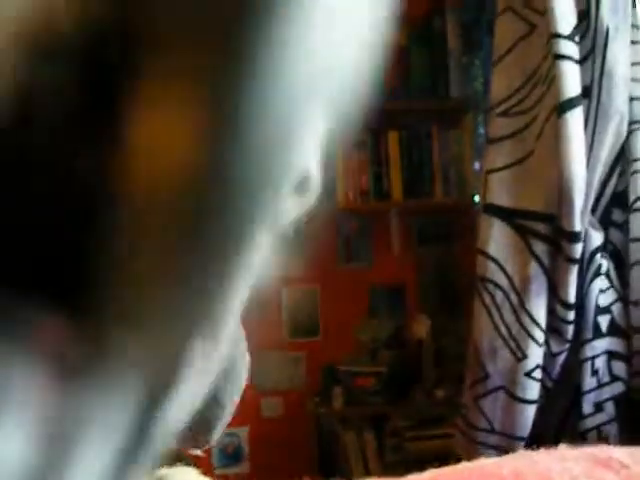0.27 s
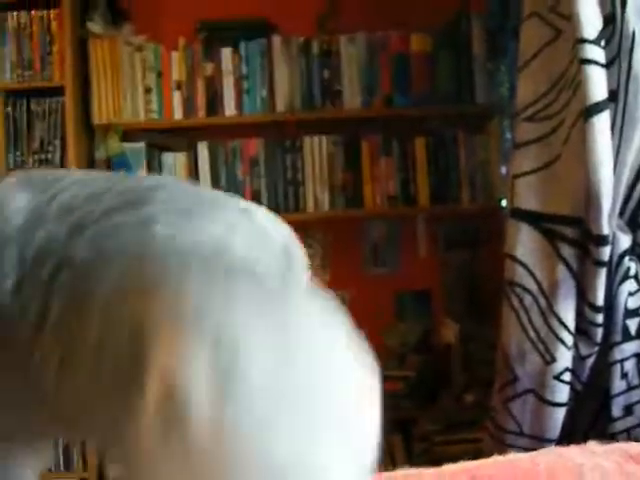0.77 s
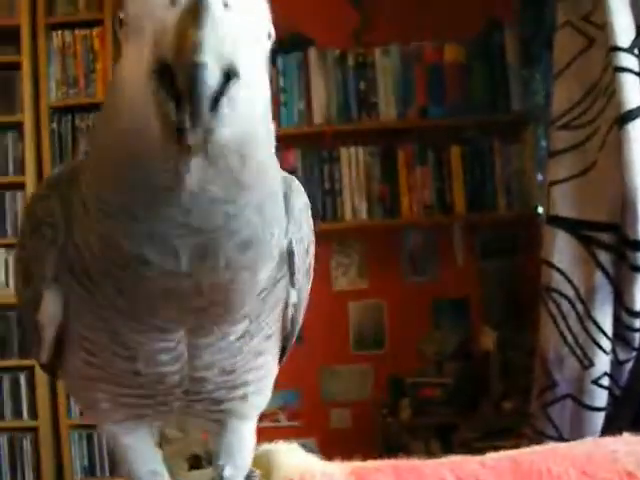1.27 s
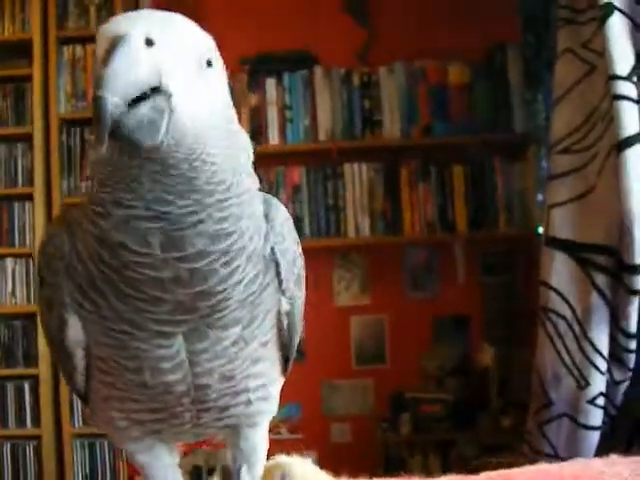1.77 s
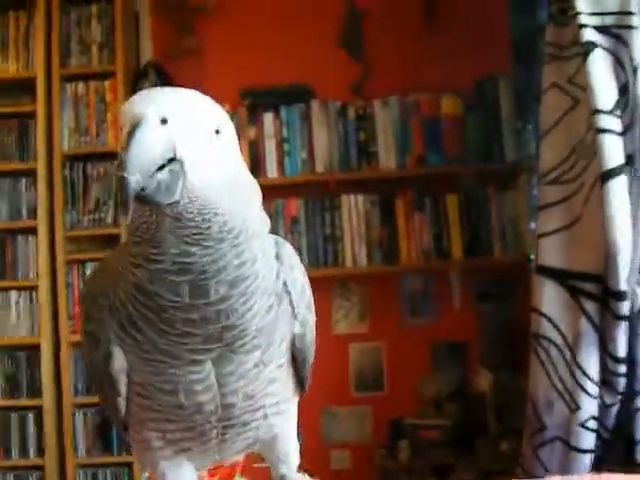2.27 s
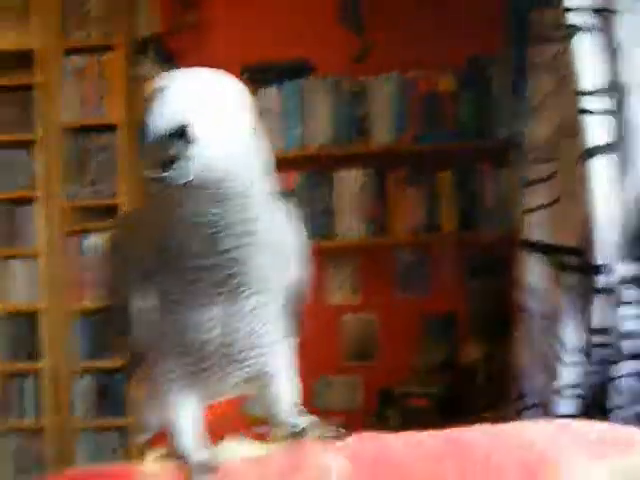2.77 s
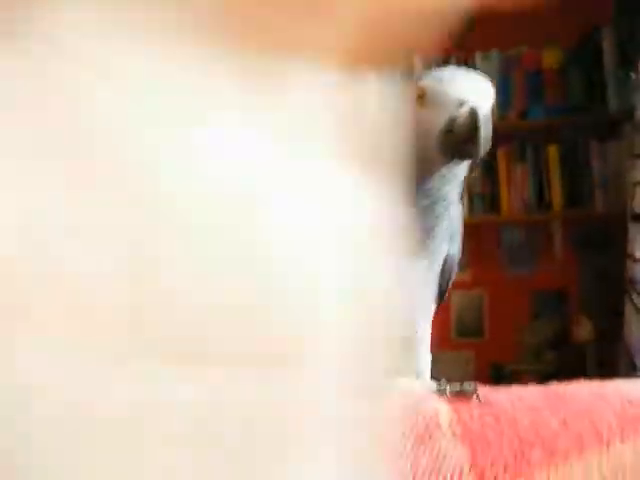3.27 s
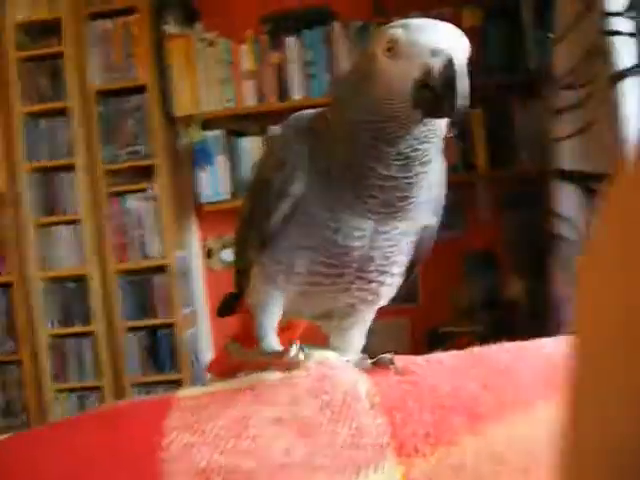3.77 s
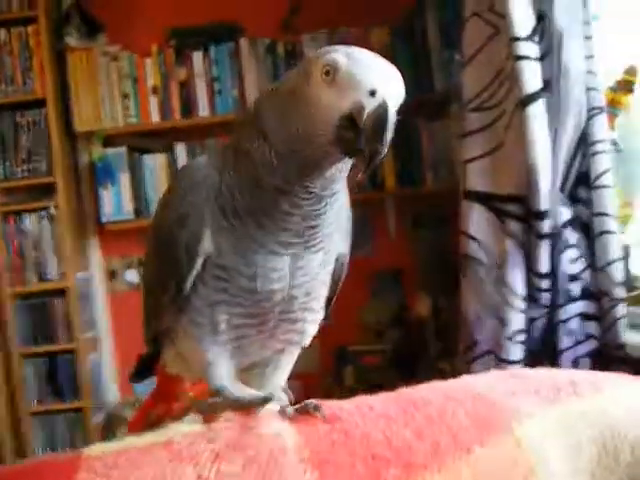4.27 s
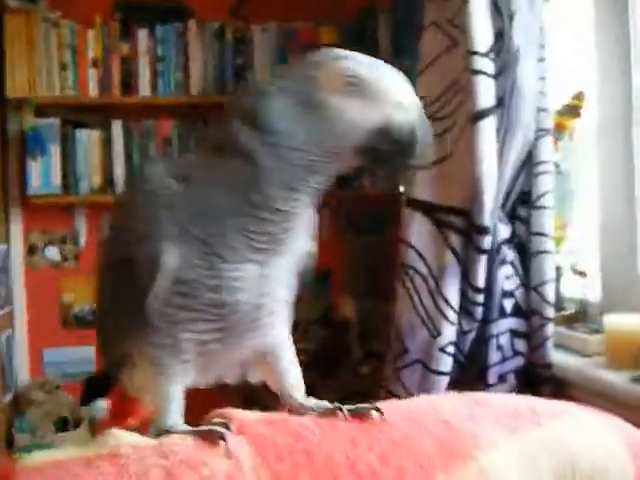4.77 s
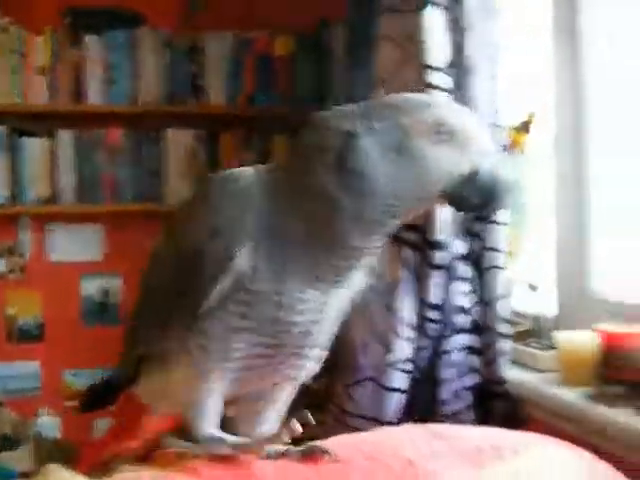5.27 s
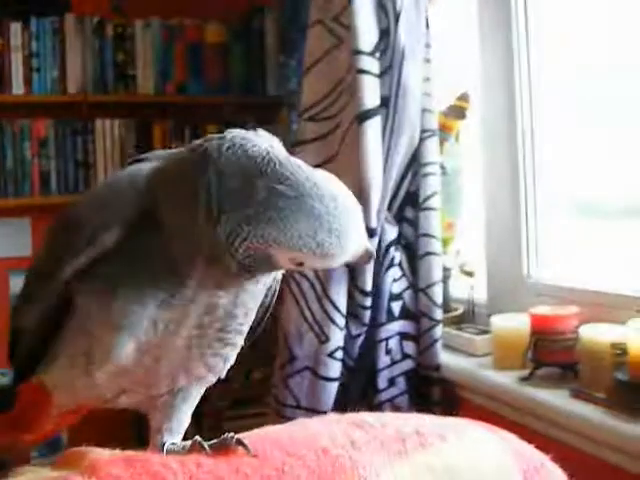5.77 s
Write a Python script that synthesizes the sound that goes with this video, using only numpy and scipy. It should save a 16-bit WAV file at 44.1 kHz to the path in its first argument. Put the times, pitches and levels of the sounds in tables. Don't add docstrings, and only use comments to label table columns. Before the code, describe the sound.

A parrot's beak ticks and clacks sharply twice amid dull perch knocks and soft cloth rustle, over a steady fan whine, hiss and growing hum.

```python
import sys
import numpy as np
from scipy import signal
from scipy.io import wavfile

SR = 44100
rng = np.random.default_rng(int(sys.argv[2]) if len(sys.argv) > 2 else 0)


def voltage_ratio(level):
    return 10 ** (np.asarray(level, float) / 20)


def generate_wav(sig):
    pcm = np.round(np.clip(np.atleast_2d(sig).T, -1, 1) * 32767).astype(np.int16)
    wavfile.write(sys.argv[1], SR, pcm)


N = 265834

# frequency in Hz, level in dB.
HISS_SPECTRUM = [(25, -12.5), (50, -20.5), (82, -18.5), (105, -15.5), (167, -11), (215, -12.5), (320, -1.5),
                 (450, -4), (700, -2), (1060, -5.5), (1300, -7), (1800, -11), (2340, -10), (3900, -16.5)]
HISS_DB = -42.5
# time in seconds, gain in dB.
HISS_SWELL = [(0, 0), (1.5, 0), (2.5, 0), (3.5, 1), (4.9, 1.5), (6.03, 0.5)]
# multiple of FAN_HZ, rms at start in dB, change in dB per second.
FAN_TONES = [(3, -46, 0), (4, -53, -2), (8, -67.5, 1), (9, -59.5, -2.5)]
FAN_HZ, MAINS_HZ = 259.4, 120.3
# time in seconds, levels of multiples 1, 3 and 5 in dB rms.
HUM_LEVELS = [(0, -76.5, -56.5, -75), (1, -62.5, -57, -78.5), (2, -57.5, -70, -72.5),
              (3, -51.5, -61.5, -70.5), (4.002, -49.5, -48, -66), (4.5, -49, -48, -63.5),
              (5.3, -50, -50.5, -54), (6.03, -52.5, -55, -57)]
# frequency in Hz, width in Hz, rms in dB.
DRONE_BANDS = [(80.5, 6, -68.5), (166.9, 4.6, -63)]

# peak time in seconds, peak in dB, length in ms.
THUMPS = [(0.0894, -38, 16), (.457, -33, 15), (0.528, -35.5, 7.8), (0.8008, -38.5, 14), (0.9269, -37, 17.5),
          (1.3, -30, 7.2), (1.3748, -32.5, 6.5), (1.969, -35.5, 3.8), (1.981, -32, 6.2),
          (2.1499, -33.5, 13), (2.1777, -29, 5.8), (2.5751, -31, 4.5), (2.5979, -40, 20),
          (2.8653, -30, 8.4), (3.1353, -39.5, 15), (3.8475, -35.5, 11.5), (3.9886, -32.5, 10.6),
          (4.162, -27, 8.9), (4.3265, -35.5, 6.8), (4.335, -32.5, 3), (4.3692, -34, 6.6), (4.451, -35, 10),
          (4.5874, -33, 7.7), (4.5991, -16, 4.1), (4.625, -33, 12), (4.714, -29.5, 7.8)]
PERCH_HZ, PERCH_HZ_PER_MS = 274, 3.5

# start in seconds, hold in seconds, level in dB, fibre hiss in dB against the rub.
STROKES = [(0.448, 0.074, -49.5, -6), (1.64, .22, -54, -9), (2.13, 0.046, -57, -3),
           (2.564, 0.0095, -51.5, -1.5), (2.644, .06, -42.5, -6.5), (2.733, 0.073, -35, -9.5),
           (2.83, 0.12, -41, -8.5), (2.947, 0.02, -31, -19), (2.973, 0.074, -38.5, -11),
           (3.07, 0.085, -43, -11.5), (3.169, 0.048, -40, -17), (3.323, 0.0053, -41.5, -21),
           (3.707, 0.037, -34.5, -9.5), (3.793, .07, -41, -12.5), (3.9, 0.067, -39.5, -21.5),
           (3.992, 0.017, -35, -11), (4.03, 0.062, -45, -12), (4.16, .03, -45, -6), (4.236, .06, -46.5, -9),
           (4.31, .025, -38.5, -7), (4.339, 0.017, -33, -6.5), (4.417, 0.035, -40, -0.5),
           (4.544, 0.053, -43.5, -4), (4.718, .04, -52.5, -10), (4.785, .004, -44, -9),
           (4.826, 0.0035, -43, -9), (4.947, .05, -58, -13), (5.778, 0.026, -46, -2.5)]
# start in seconds, hold in seconds, level in dB.
SHUFFLES = [(0.454, .05, -38.5), (1.3, 0.0032, -42), (1.66, 0.13, -44.5), (2.1, 0.18, -48.5),
            (2.572, .08, -41), (2.682, 0.27, -37.5), (3.033, 0.21, -51.5), (3.333, 0.026, -53),
            (3.69, 0.066, -41), (3.8, 0.21, -53), (4.061, 0.012, -39), (4.167, .003, -34.5),
            (4.236, .01, -46.5), (4.317, 0.021, -33.5), (4.345, 0.021, -37.5), (4.41, 0.037, -40.5),
            (4.497, .005, -46), (4.57, .01, -51), (4.65, 0.12, -46), (5.787, 0.014, -48)]
# frequency in Hz, width in Hz, level in dB.
CLOTH_MODES = [(1410, 870, -4.5), (2148, 500, 0), (2592, 400, -4.5)]
# frequency in Hz, width in Hz, level in dB.
FIBRE_MODES = [(3000, 2500, -0.3), (3670, 1700, 0)]
# frequency in Hz, width in Hz, level in dB.
PERCH_MODES = [(315, 68, 2.5), (650, 340, 1), (900, 340, 5), (1230, 870, -3)]
EDGE_S, EDGE_SHARE, RELEASE_RATIO = 0.048, 0.32, 0.77

# peak time in seconds, peak in dB, frequency in Hz.
CLAWS = [(1.299, -25, 650), (1.9167, -19, 710), (2.1777, -24.5, 550), (2.5761, -14, 796),
         (2.6551, -18, 760), (2.8652, -12, 705), (2.872, -11, 1050), (2.9689, -12.5, 770),
         (3.174, -28.5, 850), (3.7206, -19, 980), (3.8006, -31, 770), (3.8334, -25.5, 640),
         (3.8952, -24.5, 700), (3.9863, -29.5, 570), (4.0346, -20, 803), (4.0569, -20.5, 870),
         (4.1058, -21, 860), (4.1255, -28, 900), (4.1613, -16.5, 940), (4.1646, -18.5, 1270),
         (4.1713, -20, 660), (4.1814, -17.5, 870), (4.2145, -25, 800), (4.2282, -16.5, 762),
         (4.3094, -16, 1020), (4.3198, -20, 600), (4.3692, -24, 580), (4.4962, -22.5, 590),
         (4.7121, -23.5, 660), (5.3133, -19, 844)]
CLAW_MS = 1.68
# peak time in seconds, peak in dB, frequency in Hz, length in ms.
NIBBLES = [(1.3651, -21, 1980, 0.77), (1.3658, -10.5, 3300, 1.55), (1.3694, -31.5, 3340, 3),
           (1.3751, -32, 3090, 2.3), (1.3797, -28.5, 2100, 4.8), (2.853, -31, 3010, .73),
           (2.8594, -17, 1710, 3.4), (2.8602, -16.5, 3220, 2.1), (2.8648, -15, 3190, 2.5),
           (2.8678, -8.5, 1650, 1.07), (2.8697, -7, 3240, 0.82), (2.8725, -13.5, 1407, 4.24),
           (2.8741, -21, 3080, 1.2), (2.8763, -21.5, 1790, 0.69), (2.8655, -18, 364, 4.06),
           (2.8525, -24.5, 1500, 0.77), (2.846, -26.5, 2790, 0.53), (2.133, -32.5, 3540, 2.4),
           (2.944, -26, 2940, 0.99), (4.3124, -21.5, 2940, .72), (4.46, -30, 3120, 3.6),
           (4.5372, -27.5, 1970, 2.3), (4.7167, -27.5, 800, 2.2), (4.7865, -32, 3260, 2.6)]
# centre in seconds, spread in seconds, rms in dB, frequency in Hz, width in Hz.
SWISH = (1.7, .055, -45, 1300, 700)

# peak time in seconds, shell peak in dB, tip peak in dB, shell frequency in Hz.
TICKS = [(1.9164, -22.5, -18.5, 1840), (2.561, -24.5, -31, 1700), (2.5761, -11.5, -21, 1770),
         (2.5915, -27, -48, 1860), (2.654, -14, -21.5, 1740), (2.7537, -28, -44.5, 1840),
         (2.7796, -45, -23.5, 1900), (2.8149, -23.5, -48.5, 1940), (2.8465, -26.5, -46.5, 1800),
         (2.892, -45, -22.5, 1900), (2.907, -12, -20, 2220), (3.041, -28, -35, 1930),
         (3.1652, -25, -45, 2110), (3.3212, -30, -46, 2200), (3.324, -25.5, -42, 1900),
         (3.5167, -28.5, -50, 2140), (3.8331, -27, -43.5, 1860), (3.9216, -30, -46, 1970),
         (4.0488, -22, -22.5, 1640), (4.1048, -24, -49, 2090), (4.1609, -29.5, -20.5, 1520),
         (4.2285, -22.5, -44.5, 2070), (4.3092, -9, -22.5, 2050), (4.351, -25, -43.5, 1940),
         (4.4015, -21.5, -43, 1770), (4.444, -21.5, -48, 1980), (4.6686, -53.5, -26.5, 1900),
         (4.7902, -27, -28, 1990), (4.8224, -27.5, -29, 1940), (5.313, -10.5, -15, 1970)]
SHELL_MS, TIP_HZ, TIP_MS = 1.2, 2960, 1.33
BOUNCE_S, BOUNCE_DB = 0.003, -12.5

# peak time in seconds, peak in dB, start in Hz, end in Hz, length in ms.
CLACKS = [
    (1.9653, -.4, 1200, 4000, 3.1),
    (4.5985, -6, 700, 1000, 2.4),
    (4.6004, -5.4, 1050, 1300, 4.0),
    (4.5992, -8, 3250, 3450, 2.8),
]
CLACK_SOFTNESS = (3.0, 1.0, 2.0, 1.0)
# peak time in seconds, peak in dB, frequency in Hz, length in ms.
CLACK_RINGS = [(1.9628, -10, 2350, 1.2), (1.9657, -24, 1100, 3.0), (1.9678, -8, 3350, 1.2),
               (1.9698, -7, 2900, 1.4), (1.9723, -12, 2550, 1.8), (1.9738, -12, 3050, 1.4),
               (1.9758, -18, 3350, 2.5), (1.9775, -16, 2150, 1.4), (1.9665, -24, 500, 3.0),
               (1.9805, -19, 3000, 2.0), (1.9645, -14, 1750, 2.5), (1.971, -20, 1900, 2.0),
               (4.5992, -15, 420, 3.5), (4.5996, -14, 2200, 1.6), (4.606, -24, 3100, 4.0),
               (4.6074, -12, 1190, 6.0), (4.6158, -17, 1100, 2.6), (4.6205, -18, 1200, 2.6),
               (4.6255, -18, 1170, 3.0), (4.632, -23.5, 1170, 6.0)]
CLACK_RING_CLIMB = 0.02

ROOM_T60_S, ROOM_DB, CLACK_ROOM_DB = 0.12, -19, -16
CAMERA_RATE_HZ, CUTOFF_HZ = 8000, 3650
CEILING, OFFSET = 0.72, -0.0152


def rms_one(x):
    return x / np.sqrt(np.mean(x ** 2) + 1e-20)


def in_time(rows):
    s, *columns = np.transpose(rows)
    return [np.interp(np.arange(N) / SR, s, column) for column in columns]


def drift(rate_hz):
    r = np.exp(-80 * np.pi * rate_hz / SR)
    noise = rng.standard_normal(N // 40 + 2002)
    slow = signal.lfilter([1], [1, -2 * r, r * r], noise)[2000:]
    return np.interp(np.arange(N) / 40, np.arange(len(slow)), rms_one(slow))


def resonate(x, modes):
    out = 0
    for k, (hz, width_hz, level_db) in enumerate(modes):
        r = np.exp(-np.pi * width_hz / SR)
        poles = [1, -2 * r * np.cos(2 * np.pi * hz / SR), r * r]
        ring = signal.lfilter([1, 0, -1], poles, x) * (1 - r * r) / 2
        out = out + (-1) ** k * voltage_ratio(level_db) * ring
    return out


def resonate_twice(x, modes):
    return resonate(resonate(x, modes), modes)


def add_ring(out, s, level_db, start_hz, end_hz, ms, softness=1.18):
    tau = ms / 1000 / (2.45 * np.sqrt(softness))
    t = np.arange(SR // 20) / SR / tau
    shape = t ** softness * np.exp(-t)
    hz = start_hz + (end_hz - start_hz) * np.minimum(t / (softness + 3), 1)
    at = round((s - softness * tau) * SR)
    out[at:at + len(t)] += voltage_ratio(level_db) * shape / shape.max() * np.sin(2 * np.pi * np.cumsum(hz) / SR)


def small_rings(rows):
    out = np.zeros(N)
    for s, level_db, hz, ms in rows:
        add_ring(out, s, level_db - 0.7, 1.012 * hz, 1.077 * hz, 0.8 * ms)
    return out


def hiss():
    out = 0
    edges_hz = 25 * 2 ** np.arange(0, 7.5, 1 / 3)
    white = rng.standard_normal((2, N))
    hz, level_db = np.transpose(HISS_SPECTRUM)
    for k, (low, high) in enumerate(zip(edges_hz, edges_hz[1:])):
        sos = signal.butter(2, [low, high], "band", fs=SR, output="sos")
        band_db = np.interp(np.log(low * high) / 2, np.log(hz), level_db)
        flicker_db = 1.5 * drift(12.0)
        out = out + signal.sosfilt(sos, white[k % 2]) * voltage_ratio(band_db + flicker_db)
    return voltage_ratio(HISS_DB + in_time(HISS_SWELL)[0]) * rms_one(out)


def fan():
    t = np.arange(N) / SR
    turn = 2 * np.pi * np.cumsum(1 + 0.0008 * drift(1.5)) / SR
    out = np.zeros(N)
    for multiple, level_db, slope_db_per_s in FAN_TONES:
        wavering_db = level_db + slope_db_per_s * t + 0.7 * drift(3)
        out += voltage_ratio(wavering_db) * np.sin(multiple * FAN_HZ * turn)
    return np.sqrt(2) * out


def hum():
    t = np.arange(N) / SR
    out = np.zeros(N)
    for multiple, level_db in zip((1, 3, 5), in_time(HUM_LEVELS)):
        out += voltage_ratio(level_db) * np.sin(2 * np.pi * multiple * MAINS_HZ * t)
    return np.sqrt(2) * out


def drone():
    noise = rng.standard_normal(N)
    return sum(voltage_ratio(db) * rms_one(resonate(noise, [(hz, width_hz, 0)])) for hz, width_hz, db in DRONE_BANDS)


def thumps():
    return small_rings([(s, db, PERCH_HZ + PERCH_HZ_PER_MS * ms, ms) for s, db, ms in THUMPS])


def held(start_s, hold_s, level_db):
    t = np.arange(N) / SR
    edge_s = EDGE_S + EDGE_SHARE * abs(hold_s)
    outside_s = np.maximum(start_s - t, (t - start_s - hold_s) / RELEASE_RATIO)
    return voltage_ratio(level_db - 20 * np.maximum(0, outside_s) / edge_s)


def grains(per_s, spread_db):
    sizes = voltage_ratio(spread_db * np.minimum(rng.exponential(1, N), 5)) * rng.choice([-1, 1], N)
    return sizes * (rng.random(N) < per_s / SR)


def strokes():
    swells = np.array([held(*row[:3]) for row in STROKES])
    fibre_gain = voltage_ratio(np.array(STROKES)[:, 3:])
    catches = grains(4000, spread_db=2.5)
    rub = rms_one(resonate_twice(catches, CLOTH_MODES))
    fibre = rms_one(resonate_twice(catches, FIBRE_MODES))
    return swells.max(axis=0) * rub + (swells * fibre_gain).max(axis=0) * fibre


def shuffles():
    swell = np.max([held(*row) for row in SHUFFLES], axis=0)
    thud = resonate(grains(1500, spread_db=1.5), PERCH_MODES)
    return swell * rms_one(resonate(thud, [(700, 1200, 0)]))


def claws():
    return small_rings([(s, db, hz, CLAW_MS) for s, db, hz in CLAWS])


def nibbles():
    return small_rings(NIBBLES)


def swish():
    s, spread_s, level_db, hz, width_hz = SWISH
    air = resonate_twice(rng.standard_normal(N), [(hz, width_hz, 0)])
    swell = np.exp(-0.5 * ((np.arange(N) / SR - s) / spread_s) ** 2)
    return voltage_ratio(level_db) * swell * rms_one(air)


def ticks():
    rings = []
    chances = rng.uniform((0.7, 0.85), (1.5, 1.2), (len(TICKS), 2))
    for (s, shell_db, tip_db, hz), (late, off_pitch) in zip(TICKS, chances):
        rings.append((s, shell_db, hz, SHELL_MS))
        rings.append((s, tip_db, TIP_HZ, TIP_MS))
        rings.append((s + BOUNCE_S * late, shell_db + BOUNCE_DB, hz * off_pitch, 2 * SHELL_MS))
    return small_rings(rings)


def clacks():
    out = np.zeros(N)
    for row, softness in zip(CLACKS, CLACK_SOFTNESS):
        add_ring(out, *row, softness)
    for s, level_db, hz, ms in CLACK_RINGS:
        add_ring(out, s, level_db, hz * (1 - CLACK_RING_CLIMB), hz * (1 + CLACK_RING_CLIMB), ms, 2.0)
    return out


def room(x):
    t = np.arange(SR // 4) / SR
    echoes = rng.standard_normal(len(t)) * voltage_ratio(-60 * t / ROOM_T60_S) * np.clip(t / 0.01, 0, 1)
    return signal.fftconvolve(x, echoes / np.sqrt(np.sum(echoes ** 2)))[:N]


def scene():
    background = hiss() + fan() + hum() + drone()
    small = thumps() + claws() + nibbles() + ticks()
    loud = clacks()
    echoes = room(voltage_ratio(ROOM_DB) * small + voltage_ratio(CLACK_ROOM_DB) * loud)
    return (background + small + loud + echoes + strokes() + shuffles() + swish())[None]


def low_pass(x, hz):
    taps = signal.firwin(177, hz, window=("kaiser", 4.2), fs=SR)
    return signal.fftconvolve(x, taps[None], "same")


def top_cut(x):
    return signal.sosfilt(signal.butter(12, 16850, fs=SR, output="sos"), x)


def record(dry):
    t = np.arange(N) / SR
    capsule = dry + 0.05 * dry ** 2
    sampled = low_pass(capsule, CUTOFF_HZ + 300)
    mirror = low_pass(2 * sampled * np.cos(2 * np.pi * CAMERA_RATE_HZ * t), 5200)
    narrow = low_pass(sampled + mirror, CUTOFF_HZ + 10)
    return top_cut(np.clip(narrow + OFFSET, -CEILING, CEILING))


dry = scene()
out = record(dry)
generate_wav(out)
```